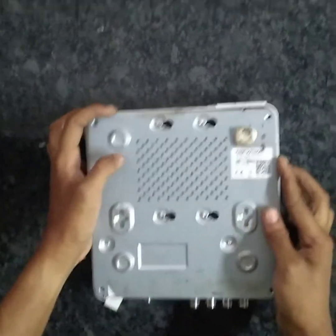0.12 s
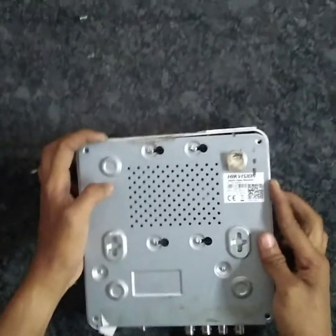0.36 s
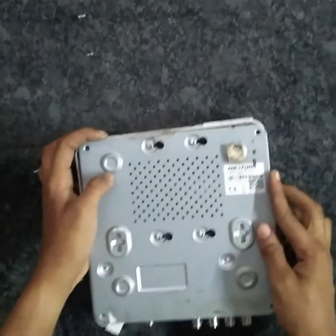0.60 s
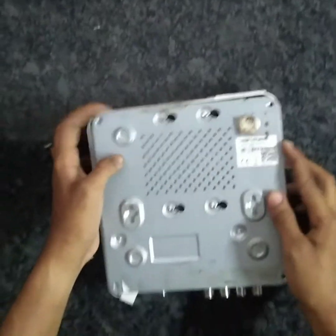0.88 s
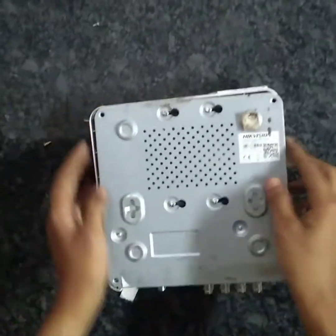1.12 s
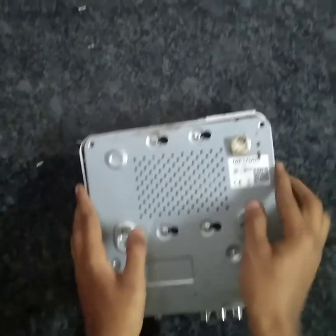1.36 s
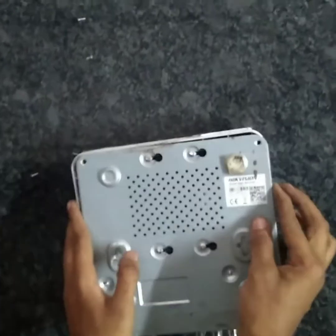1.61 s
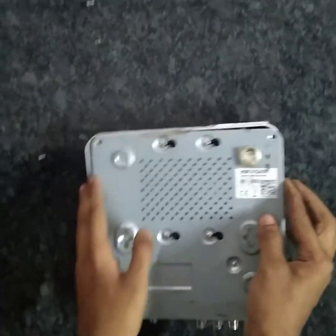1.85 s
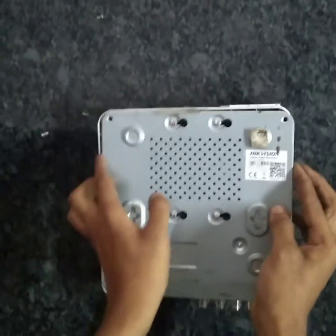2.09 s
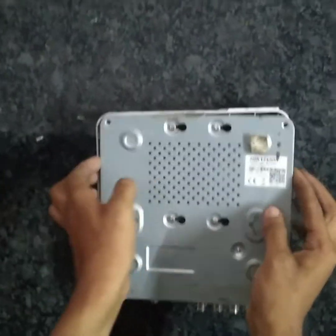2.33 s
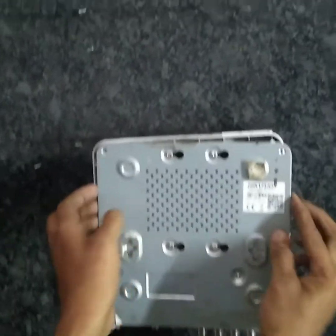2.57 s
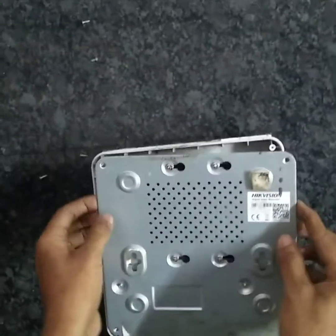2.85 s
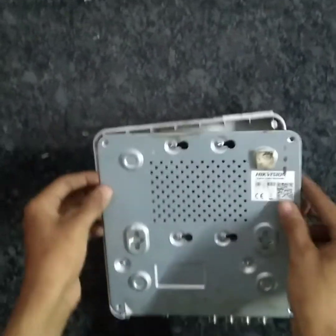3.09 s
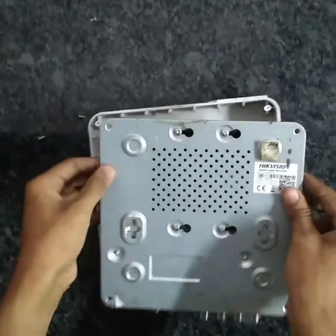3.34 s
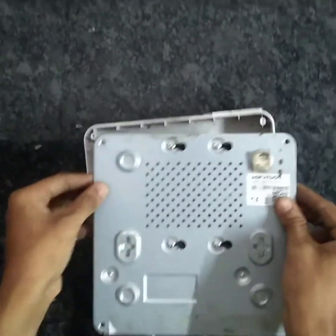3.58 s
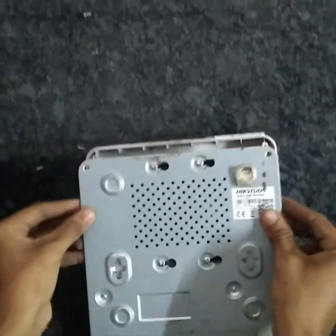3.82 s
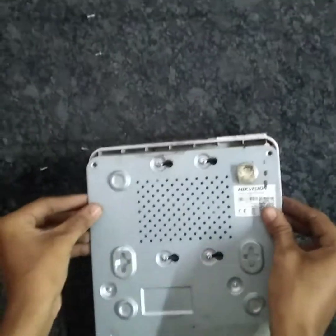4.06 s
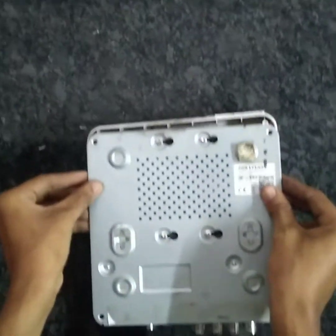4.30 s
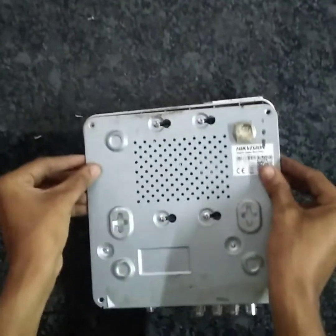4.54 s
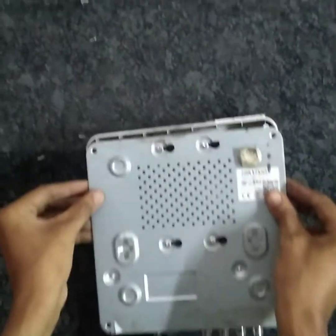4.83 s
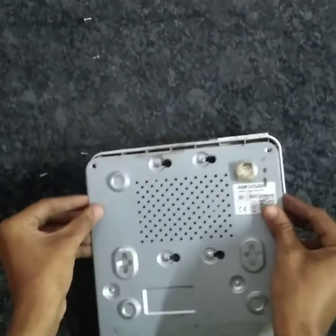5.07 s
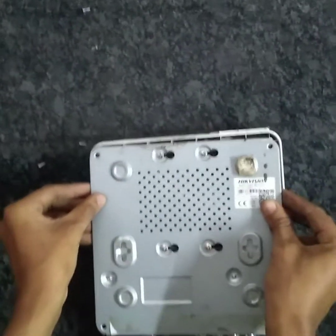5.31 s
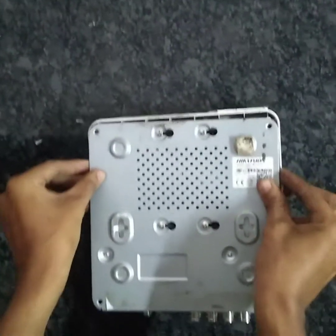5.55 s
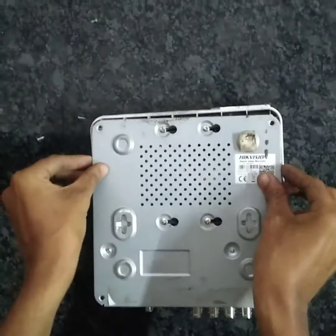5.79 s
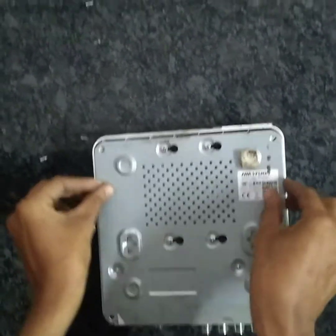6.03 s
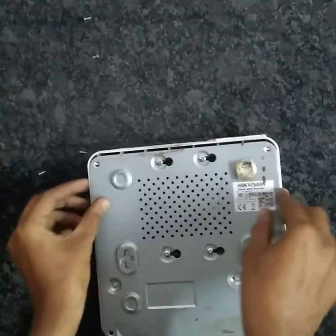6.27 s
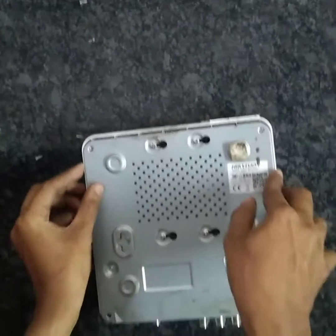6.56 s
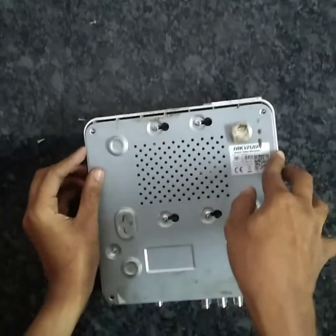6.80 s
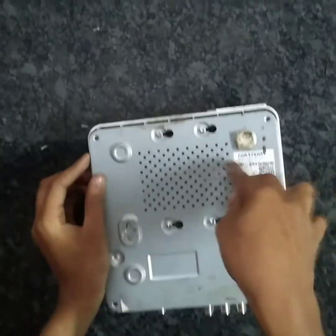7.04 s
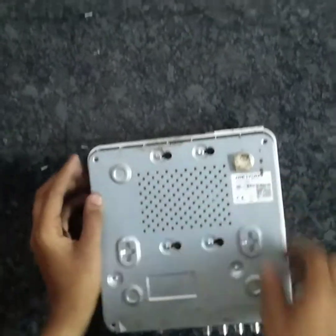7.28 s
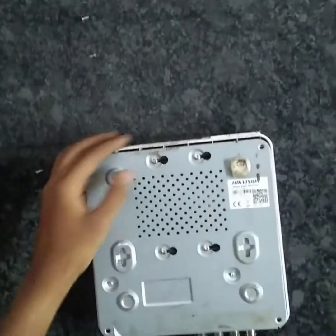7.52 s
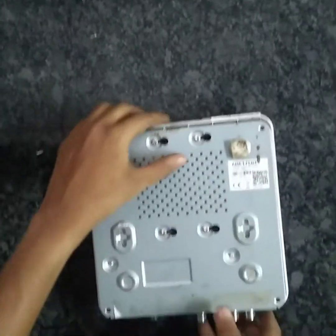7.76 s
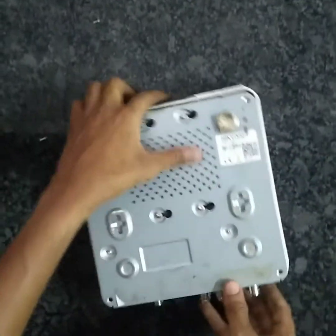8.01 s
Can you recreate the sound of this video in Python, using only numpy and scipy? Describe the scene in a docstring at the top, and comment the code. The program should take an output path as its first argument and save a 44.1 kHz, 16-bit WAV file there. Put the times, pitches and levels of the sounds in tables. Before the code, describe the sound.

Hands work the lid of a thin metal box on a stone floor. Continuous uneven rubbing and dull taps come first, then a loud knock and short metallic squeal. The middle is sparse, with light ticks and thin squeaks; rubbing edges and firm clunks return before the end settles into near silence. Distant hoarse crow calls, close stereo pickup, small room reflections.

```python
"""Sheet-metal case dragged over stone

Hands drag a metal case over a stone floor and work its lid loose: scrapes, squeaks, clicks and knocks. Drag:
random bumps swell a gliding base resonance; random contacts ring the panels and make the grit hiss. Knocks:
noise cracks plus damped case modes. Squeaks and the crow's faint caws: narrow noise bands on gliding pitches.
Stereo: two microphone ports, each minus the other after a short delay, then a noise suppressor."""
import sys
import numpy as np
from scipy import signal
from scipy.fft import rfft, irfft, next_fast_len
from scipy.io import wavfile
from scipy.ndimage import uniform_filter1d

SR = 44100
rng = np.random.default_rng(int(sys.argv[2]) if len(sys.argv) > 2 else 0)


def persist_wave(psi):
    """Save psi, clipped to +-1, as 16-bit WAV."""
    counts = np.round(np.clip(psi, -1, 1) * 32767).astype(np.int16)
    wavfile.write(sys.argv[1], SR, np.atleast_2d(counts).T)


def boost_factor(decibels):
    """Convert a level in decibels to a linear amplitude factor."""
    exponent = np.asarray(decibels, float) / 20
    return 10 ** exponent


N = 358974

# background spectrum: (frequency [Hz], level [dB])
AIR_SPECTRUM = [(30, 5.5), (100, 10), (250, 0), (600, 1), (1500, -2.5), (3000, -8), (6000, -7.5),
                (10000, -11.5), (16000, -17)]
AIR_DB = -64.5
# brief sink of the background: (centre [s], half width [s], depth [dB])
AIR_DIP = (3.8, 0.16, -6)

# crow calls: (start [s], length [s], main resonance [Hz], level [dB])
CAWS = [(0.264, 0.3, 1387, -53), (0.949, 0.38, 1330, -51.5), (1.625, 0.25, 1423, -53),
        (3.294, 0.35, 1379, -59), (3.952, .33, 1366, -61.5), (4.651, 0.27, 1373, -59)]
# throat resonances: (factor on main resonance [1], width [Hz], level [dB])
THROAT = [(0.493, 90, -7), (0.921, 88, -13.5), (1, 95.4, 12.5), (1.219, 200, -2), (1.382, 131.8, 3.5)]
CAW_EDGE_S, CAW_FADE_DB, CAW_SAG_SHARE = 0.057, -8.5, 0.071
CAW_HOARSE_DB = -10.5  # the main resonance fades into the others
CAW_PULSES_PER_S, CAW_JITTER, CAW_BREATH = 90, 5, 0.5

# edges squeaking as they slide: (peak [s], pitch [Hz], level [dB], rise [s], fall [s])
SQUEAKS = [(1.119, 309, -49.5, .3, 0.27), (3.284, 752.6, -57, .06, 0.42), (3.78, 391.4, -67.5, .1, 0.056),
           (5.07, 1636, -65.5, .045, 0.17), (5.278, 784, -51.5, 0.063, 0.059),
           (5.632, 3150, -62, 0.027, 0.079), (5.678, 3260, -60, .04, 0.045),
           (6.029, 1091, -52.5, .04, 0.11), (6.088, 435, -69.5, .4, 0.017), (6.261, 1088, -52, .15, .12),
           (6.335, 1287, -48, .12, 0.22), (6.565, 1232, -48.5, .12, 0.075), (6.664, 1336, -42, 0.14, 0.098),
           (6.84, 1304, -71, 0.15, .25)]
SQUEAK_SPAN_DB = 32  # level lost at both ends of a stroke
SQUEAK_SAG_RISING, SQUEAK_SAG_FALLING = 0.1, 0.047  # share of pitch lost at the ends
# lid edge sticking and slipping: (time [s], pitch [Hz], relative level [dB])
SQUEAL = [(2.69, 899, -39.5), (2.738, 902, -22), (2.752, 896, -30.5), (2.765, 909, -35), (2.778, 876, -22),
          (2.789, 898, -34), (2.804, 905, -24.5), (2.818, 908, -36), (2.83, 889, -26), (2.868, 888, -42.5),
          (2.888, 860, -33.5), (2.91, 885, -48), (2.97, 861, -54)]
# squeal overtones: {harmonic number: level [dB]}
SQUEAL_TONES = {2: -18, 3: -22, 4: -27, 6: -29, 7: -33}
# rubbed panel singing: (time [s], relative level [dB])
CHIME = [(1.08, -56), (1.14, -37), (1.2, -41), (1.215, -52), (1.3, -50)]

# modes of the case: (frequency [Hz], level [dB], undamped t60 [s])
CASE_MODES = [(113, -2, 0.32), (249, 0.5, 0.48), (361.2, -2.5, 0.16), (448, -4.5, 0.22), (490, -8.5, 0.31),
              (545.4, -7.5, .35), (605.3, -3.5, 0.67), (709, -4, 0.26), (781, 2.5, 0.17), (842, -3, 0.37),
              (924.3, 2, 0.12), (1105, -1.5, 0.089), (1190, -10.5, 0.17), (1270, -4.5, 0.22),
              (1815, -5.5, 0.13), (2340, -3, 0.12), (2862, -4.5, 0.12), (3150, -2, 0.063),
              (3330, -10, 0.15), (3730, -13.5, 0.1), (4990, -24.5, 0.34), (6740, -22, 0.29),
              (7460, -25, 0.18), (8400, -22, 0.33)]
# knocks and clicks: (time [s], relative level [dB], boom, bass, treble weight [dB], ring t60 [s])
KNOCKS = [(0.0209, -36, -14, -22, -4, 0.22), (0.0343, -26, -14, -29, -3.5, 0.14),
          (0.263, -33.5, -2.5, 0, -24.5, 0.4), (0.3582, -38, -27, -31, -6.5, 0.12),
          (0.6988, -26.5, -4.5, -2.5, -21.5, 0.25), (.706, -27, -37, 7, -26, 0.1),
          (0.8263, -24.5, -39, -8, -4.5, 0.094), (0.926, -38.5, -41, -6, -2, 0.34),
          (0.979, -48, 7, -15, -29.5, 0.096), (1.0584, -32, -71, 6.5, -4.5, 0.098),
          (1.092, -56, -2, -12, -27, 0.11), (1.183, -50, -3, -4, -30, 0.093),
          (1.365, -43, -14, 14, -36, 0.054), (1.4072, -42, -61, 8.5, -21, 0.13),
          (1.4778, -38, -26, -3, -6.5, 0.92), (1.5932, -29, -22, 1, -13, 0.64),
          (1.663, -21.5, -43, -15, -12, 0.26), (1.8695, -26, -22.5, -0.5, -50, 0.37),
          (2.236, -23.5, -1.5, 0.5, -16, 0.25), (2.4029, -40.5, -1, 4, -25, 0.17),
          (2.463, -32, -7.5, 1, -21, .3), (2.4761, -10, -14.5, 5, -27.5, 0.08),
          (2.6413, -22, -27.5, 8.5, -24, 0.13), (2.7229, -25.5, -17.5, -19.5, -10.5, 0.54),
          (2.8538, -36.5, -21.5, 10, -3.5, 0.15), (3.0759, -42, -41, -6, -31, 0.15),
          (3.1857, -42, -12, -17, -7, 0.11), (3.264, -48, -30, 6.5, -20, 0.25),
          (3.2919, -42.5, -35, -4.5, -20.5, 0.28), (3.3371, -39.5, -33, 4, -28.5, 0.12),
          (3.3763, -29.5, -29, -13, -16, 0.086), (3.439, -43.5, -25, 1, -20.5, .1),
          (3.477, -38.5, -13, 3.5, -27, 0.25), (3.5479, -27, -19, 0.5, -16.5, 0.055),
          (3.552, -27, -12, -1, -29.5, .045), (4.139, -45.5, -11.5, -24, -13, 0.2),
          (4.646, -45, -22, -19, -16, 0.63), (5.224, -25, -21.5, -20.5, -33, 0.11),
          (5.279, -30.5, -34, -12, -33.5, 0.18), (5.308, -31.5, -41, -34.5, -30, 0.12),
          (5.352, -25.5, -40, -26, -7.5, 0.11), (5.3639, -20, -29, -14, -8, 0.15),
          (5.389, -32, -25, -7, -11, .1), (5.568, -51, -3.5, -9, -22.5, .08),
          (5.6211, -52, 8, -24, -35, 0.068), (5.665, -45.5, -9, 6, -29.5, 0.07),
          (5.675, -36, -11, -1.5, -26.5, 0.11), (5.7454, -45.5, -1, 0.5, -20.5, 0.056),
          (5.7823, -28.5, -19, -16, -9, 0.096), (6.122, -41, 0, 16, -11.5, 0.24),
          (6.147, -13, -7.5, 1, -18, 0.11), (6.182, -35.5, -41, -19.5, 2, 0.088),
          (6.4409, -30.5, -12, -1.5, -19.5, 0.093), (6.551, -31.5, -45, -26, -5, 0.17),
          (6.6395, -38.5, -11.5, 2.5, -30, 0.22), (6.9751, -48, -6.5, -4, -6.5, 0.23),
          (6.9897, -31.5, -17.5, -20, -11.5, 0.59), (7.0434, -15.5, -28, -7.5, -17.5, 0.16),
          (7.0739, -11, -7.5, -1, -21, 0.34), (7.079, -8.5, -18, 3, -16.5, 0.043),
          (7.096, -27, 3, -1, -19, 0.36), (7.122, -23.5, 5.5, -1, -14, 0.25),
          (7.155, -31.5, 2, 1, -20, 0.15), (8.0165, -57, -3.5, -16, -4.5, 0.31)]
# noise of a blow: (frequency [Hz], level [dB])
CRACK_SPECTRUM = [(60, -45), (200, -15.5), (800, -1), (2500, -0.5), (5000, -5.5), (10000, -19.5),
                  (16000, -32)]
MODE_DETUNE = 0.01  # spread of mode pitch from blow to blow, as a share
CONTACT_S = 0.0027  # a blow builds up while the edges meet
SEAT_S, SEAT_FALL_S, SEAT_DB = 0.013, 0.005, -0.5  # free ringing, then the parts seat

# base resonance under the hands: (time [s], frequency [Hz])
BASE = [(0.0, 161), (2.04, 164), (2.27, 186.6), (4.58, 131.8), (5.69, 137.6), (5.92, 176.5), (6.28, 171.5),
        (6.64, 137.2), (6.82, 188.7), (7.2, 170.5), (7.26, 115.5), (7.64, 116), (8.14, 129.6)]
# one long drag: (time [s], rumble [dB], scrape [dB], grit [dB])
DRAG = [(0.0, -28, -37, -35), (0.08, -31, -44, -49), (0.41, -40, -56, -51), (0.57, -50, -63.5, -57.5),
        (0.62, -37, -57, -54.5), (0.72, -42, -54, -51.5), (0.78, -33.5, -60.5, -49),
        (0.88, -39.5, -50.5, -49.5), (1.11, -33, -52, -45), (1.17, -34.5, -53.5, -50.5),
        (1.35, -36, -52, -50), (1.42, -39, -53, -50), (1.9, -41.5, -52.5, -50), (2.2, -56, -54.5, -54),
        (2.29, -39.5, -53, -51), (2.36, -53, -63.5, -56.5), (2.46, -45, -40.5, -47.5),
        (2.501, -30, -43, -41), (2.63, -35, -44.5, -48.5), (2.7, -40.5, -36, -39.5),
        (2.859, -46.5, -49, -44), (2.95, -50.5, -58.5, -57), (3.04, -53, -56.5, -59.5),
        (3.2, -83, -78.5, -68)]
# separate nudges: (full force from [s], hold [s], rumble [dB], scrape [dB], grit [dB])
NUDGES = [(3.063, 0.013, -48.5, -64, -57), (3.289, 0.18, -72.5, -67, -57.5),
          (3.492, 0.039, -69, -52, -44.5), (3.979, .015, -55, -81, -73.5),
          (4.386, 0.017, -66.5, -75.5, -73.5), (4.684, 0.18, -67, -84, -64.5),
          (5.059, 0.024, -60, -95, -64.5), (5.278, 0.031, -50.5, -75, -61),
          (5.383, 0.058, -59, -66.5, -42.5), (5.628, .01, -49, -79, -54.5), (5.67, .01, -56, -79, -50),
          (5.747, 0.63, -83, -82.5, -64.5), (6.152, 0.058, -35, -57, -39), (6.27, 0.1, -50, -67.5, -59.5),
          (6.41, 0.14, -52, -74, -57), (6.575, 0.11, -62.5, -71.5, -53.5), (7.001, 0.0503, -72, -78.5, -50),
          (7.105, 0.13, -35.5, -58, -53), (7.232, .14, -44.5, -60.5, -56.5),
          (7.447, 0.091, -61.5, -72.5, -65.5), (8.003, .2, -85, -68.5, -65)]
NUDGE_RISE_DB_PER_S = 502
# nudge decay: (rumble [dB/s], scrape [dB/s], grit [dB/s])
NUDGE_FALLS_DB_PER_S = (196.5, 302.5, 348)
# hands resting on the case: (rumble [dB], scrape [dB], grit [dB])
REST_DB = (-90, -89.5, -66.5)
# scrape spectrum: (frequency [Hz], level [dB])
SCRAPE_SPECTRUM = [(250, -40.5), (500, 4.5), (900, 7), (1600, 7), (2500, -26.5), (4000, -31.5)]
# grit spectrum: (frequency [Hz], level [dB])
GRIT_SPECTRUM = [(1000, -9), (2000, 6), (3300, 1.5), (5000, -6), (8000, -17.5), (12000, -36),
                 (16000, -78.5)]
# part of the panel ring that grit excites: (frequency [Hz], level [dB])
GRIT_RING_SPECTRUM = [(1200, -40), (2500, 0), (6000, 8), (8000, -6)]
# grit thrown up by a knock: (frequency [Hz], level [dB])
FIZZ_SPECTRUM = [(3000, -24.5), (6000, 3.5), (10000, -5.5), (16000, -26.5)]
FIZZ_DB, FIZZ_FALL_DB_PER_S = -38, 128  # level re knock
SHAKE_DB, SHAKE_FALL_DB_PER_S = -18.5, 449  # grit shaken loose, level re knock
SHAKE_PER_TREBLE = 0.25  # dB of shake per dB of treble weight
TICKS_PER_S, TICK_SPREAD_DB, TICK_DB = 90, 8, -7  # loose edges ticking

# room decay: (frequency [Hz], t60 [s])
ROOM = [(150, 0.26), (700, 0.44), (3000, 0.2), (10000, 0.64)]

# bass cut of the microphone: (frequency [Hz], level [dB])
MIC_LOW = [(20, -16.5), (45, -1.5), (90, -1.5), (300, -0.5)]
# likeness of the ports: (frequency [Hz], likeness [0-1])
SHARED = [(100, 0.4), (200, .45), (400, 0.58), (800, 0.49), (1500, 0.012)]
# subtraction between ports: (frequency [Hz], share of the other port [0-1])
CROSS = [(100, 0.74), (2200, 0.82), (4500, 0.57), (8000, 0.22), (11000, 0.069), (14000, 0.37)]
CROSS_S, RIGHT_LATE_S = 0.000437, 0.000016
# phase lag of the right: (frequency [Hz], lag beyond RIGHT_LATE_S [rad])
RIGHT_TURN = [(60, -1), (170, -1.32), (250, -.8), (350, 0.29), (500, 0.3), (900, 0.3), (1400, -0.66),
              (2800, 0.012), (5000, 0.13)]
# right over left: (frequency [Hz], level [dB])
RIGHT_LIFT = [(150, -2), (1500, -.6), (4500, 2), (15000, .6)]


def evened(x):
    """Scales to rms 1."""
    return x / np.sqrt(np.mean(x ** 2) + 1e-20)


def read(points, hz):
    """Interpolates a table on a log-frequency axis."""
    f, value = np.transpose(points)
    return np.interp(np.log(hz + 1), np.log(f + 1), value)


def colour(x, points):
    """Filters x by a spectrum in dB."""
    size = next_fast_len(len(x) + SR // 10)
    gain = boost_factor(read(points, np.fft.rfftfreq(size, 1 / SR)))
    return irfft(rfft(x, size) * gain, size)[:len(x)]


def add(mix, start_s, sound):
    """Mixes a sound in at start_s."""
    part = mix[round(start_s * SR):][:len(sound)]
    part += sound[:len(part)]


def unroll(rows):
    """Time axis and sample-rate columns of a curve table."""
    s, *columns = np.transpose(rows)
    t = np.arange(s[0], s[-1], 1 / SR)
    return [t] + [np.interp(t, s, c) for c in columns]


def whistle(hz, width_hz):
    """Complex narrow-band noise: two-pole lowpass noise shifted up to the curve hz."""
    r = np.exp(-np.pi * width_hz / SR)
    slow = rng.standard_normal(len(hz)) + 1j * rng.standard_normal(len(hz))
    slow = signal.lfilter([1], [1, -2 * r, r * r], slow)
    carrier = np.exp(2j * np.pi * np.cumsum(hz) / SR)
    return slow / np.sqrt(np.mean(abs(slow) ** 2) / 2) * carrier


def random_hits(per_s, spread_db):
    """Sparse impulses at random times, with exponentially spread levels."""
    size = boost_factor(spread_db * np.minimum(rng.exponential(1, N), 3))
    return size * (rng.random(N) < per_s / SR)


def background_air():
    """Steady coloured noise that sinks briefly."""
    air = boost_factor(AIR_DB) * evened(colour(rng.standard_normal(N), AIR_SPECTRUM))
    centre_s, half_s, dip_db = AIR_DIP
    t = np.arange(N) / SR
    return air * boost_factor(dip_db * np.exp(-((t - centre_s) / half_s) ** 2))


def voice_rasp():
    """Jittered pulses of the crow's voice over steady breath."""
    jitter = CAW_JITTER * uniform_filter1d(rng.standard_normal(N), size=200)
    rate = CAW_PULSES_PER_S * (1 + jitter)
    return CAW_BREATH + evened(np.cos(np.pi * np.cumsum(rate) / SR) ** 4)


def crow(rasp):
    """Hoarse caws: noise in the throat resonances, ever more chopped by the voice pulses."""
    out = np.zeros(N)
    for start_s, length_s, top_hz, db in CAWS:
        t = np.arange(0, length_s, 1 / SR)
        progress = t / length_s
        hz = top_hz * (1 - CAW_SAG_SHARE * progress ** 2)
        caw = 0
        for factor, width_hz, part_db in THROAT:
            hoarse_db = (factor == 1) * CAW_HOARSE_DB * progress
            caw = caw + boost_factor(part_db + hoarse_db) * whistle(hz * factor, width_hz).real
        edges = np.clip(np.minimum(t, length_s - t) / CAW_EDGE_S, 0, 1)
        chop = rasp[round(start_s * SR):][:len(t)] ** progress
        add(out, start_s, boost_factor(db + CAW_FADE_DB * progress) * caw * edges * chop)
    return out


def edge_squeaks(judder):
    """Sliding edges: fuzzy bands that peak in level and pitch at the hardest push, sliding in fits."""
    out = np.zeros(N)
    for peak_s, top_hz, db, rise_s, fall_s in SQUEAKS:
        t = np.arange(-rise_s, fall_s, 1 / SR)
        slack = np.maximum(-t / rise_s, t / fall_s)  # 0 at the hardest push, 1 at the ends
        hz = top_hz * (1 - np.where(t < 0, SQUEAK_SAG_RISING, SQUEAK_SAG_FALLING) * slack)
        rub = whistle(hz, 90).real + boost_factor(-3) * whistle(0.9 * hz, 220).real
        rub += boost_factor(-20) * whistle(0.41 * hz, 90).real
        rub += boost_factor(-16.5) * whistle(1.9 * hz, 300).real
        add(out, peak_s - rise_s, boost_factor(db - SQUEAK_SPAN_DB * slack) * rub)
    return out * judder ** 1.51


def lid_squeal():
    """Stick-slip of the lid edge: a throbbing tone with overtones locked to its phase."""
    out = np.zeros(N)
    t, hz, db = unroll(SQUEAL)
    core = whistle(hz, 13)
    turn = core / abs(core)  # steady size, wandering phase
    tone = turn.real + boost_factor(-11.5) * whistle(hz, 70).real
    for harmonic, part_db in SQUEAL_TONES.items():
        flutter = whistle(0 * hz, 90)
        tone += boost_factor(part_db) * (turn ** (harmonic - 1) * core * flutter).real
    add(out, t[0], boost_factor(db + 0.5) * tone * signal.windows.tukey(len(t), 0.1))
    return out


def panel_chime():
    """A rubbed panel singing: three narrow noise bands at mode pitches."""
    out = np.zeros(N)
    t, db = unroll(CHIME)
    tones = whistle(3330 + 0 * t, 58).real + boost_factor(-0.5) * whistle(3745 + 0 * t, 60).real
    tones += boost_factor(-8.0) * whistle(2930 + 0 * t, 55).real
    add(out, t[0], boost_factor(db - 5.5) * tones * signal.windows.tukey(len(t), 0.3))
    return out


def knock(db, boom_db, bass_db, treble_db, ring_t60_s):
    """A crack, a rattle of dense high modes, case modes damped by the hands, and hollow air in the case."""
    t = np.arange(round(np.clip(1.7 * ring_t60_s, 0.12, 0.5) * SR)) / SR
    t60_s = max(ring_t60_s, 0.02)

    hz, mode_db, own_t60_s = np.transpose(CASE_MODES)[:, :, None]
    luck = rng.standard_normal((len(CASE_MODES), 3))
    hz = hz * (1 + MODE_DETUNE * luck[:, 2:])  # the grip bends the panels a little
    struck_db = mode_db + 4 * luck[:, :1]  # each blow lands elsewhere
    decay_per_s = np.hypot(1 / np.clip(own_t60_s, 0.02, 1), 1 / t60_s)
    ring = boost_factor(struck_db - 60 * t * decay_per_s) * np.sin(2 * np.pi * hz * t + 9 * luck[:, 1:2])

    noise = evened(colour(rng.standard_normal(len(t)), CRACK_SPECTRUM))
    dull = evened(colour(noise, [(400, -1.5), (3000, -14.5), (12000, -2.5)]))
    crack = noise * boost_factor(-60 * t / 0.036)
    rattle = dull * boost_factor(-11.5 - 60 * t / t60_s)
    hollow = evened(colour(noise, [(90, -8), (200, 0.5), (700, -3), (1500, -34)]))
    hollow *= (1 - np.exp(-t / 0.032)) * boost_factor(-60 * t / (1.73 * t60_s))  # swells, then lingers

    sound = crack + rattle + boost_factor(-8.5) * ring.sum(0) + boost_factor(-10.0) * hollow
    sound = colour(sound, [(150, boom_db - 7.5), (400, boom_db + 8.5), (850, bass_db),
                           (1800, 0.026), (4000, 0.0092), (7000, treble_db + 13.0)])
    seated = boost_factor(SEAT_DB * np.clip((t - SEAT_S) / SEAT_FALL_S, 0, 1))
    fade_out = np.cos(np.pi / 2 * t / t[-1])
    onset = np.clip(t / CONTACT_S, 0, 1) ** 3.6
    return boost_factor(db - 4.5) * sound * seated * fade_out * onset


def lumps(per_s, spread_db, pole_t60_s):
    """Uneven rubbing pressure: random contacts of uneven size through a double-pole decay, at rms 1."""
    r = boost_factor(-60 / (max(pole_t60_s, 0.005) * SR))
    return evened(signal.lfilter([1], [1, -2 * r, r * r], random_hits(per_s, spread_db)))


def tent(t, start_s, hold_s, rise_db_per_s, fall_db_per_s):
    """Gain of a gesture: climbs to 1 at start_s, holds, falls away."""
    rise_db = rise_db_per_s * np.maximum(start_s - t, 0)
    fall_db = fall_db_per_s * np.maximum(t - start_s - hold_s, 0)
    return boost_factor(-rise_db - fall_db)


def motion():
    """Gains of rumble, scrape, grit and fizz: drag, nudges, resting hands and knock-shaken grit add in power."""
    t = np.arange(0, N, 32) / SR
    s, *drag_db = np.transpose(DRAG)
    power = np.array([boost_factor(np.interp(t, s, db, right=-200)) ** 2 + boost_factor(rest_db) ** 2
                      for db, rest_db in zip(drag_db, REST_DB)])
    for start_s, hold_s, *levels_db in NUDGES:
        for row, (db, fall) in enumerate(zip(levels_db, NUDGE_FALLS_DB_PER_S)):
            power[row] += (boost_factor(db) * tent(t, start_s, hold_s, NUDGE_RISE_DB_PER_S, fall)) ** 2
    fizz = np.zeros(len(t))
    for start_s, db, _, _, treble_db, _ in KNOCKS:
        fizz_gain = boost_factor(db + FIZZ_DB + treble_db / 2)
        fizz += (fizz_gain * tent(t, start_s, 0, 1500, FIZZ_FALL_DB_PER_S)) ** 2
        shake_gain = boost_factor(db + SHAKE_DB + SHAKE_PER_TREBLE * treble_db)
        power[2] += (shake_gain * tent(t, start_s + 0.0054, 0, 1500, SHAKE_FALL_DB_PER_S)) ** 2
    return [np.interp(np.arange(N) / SR, t, np.sqrt(p)) for p in [*power, fizz]]


def panel_response():
    """Impulse response of the case modes, each at 0.4 of its undamped t60."""
    t = np.arange(4000) / SR
    return sum(boost_factor(db - 60 * t / (0.4 * t60_s)) * np.sin(2 * np.pi * hz * t)
               for hz, db, t60_s in CASE_MODES)


def drag(coarse, fine, bumps, tick_hits):
    """Bumps swell the base rumble; coarse slips scrape and ring the panels; finer ones make the grit hiss."""
    rumble_gain, scrape_gain, grit_gain, fizz_gain = motion()
    panels = panel_response()

    base_hz = np.resize(unroll(BASE)[1], N)
    rumble = whistle(base_hz, 40).real + boost_factor(-7) * whistle(1.3 * base_hz, 60).real
    rumble += boost_factor(-7.5) * whistle(0.68 * base_hz, 39).real
    rumble += boost_factor(-14.5) * whistle(1.7 * base_hz, 100).real * fine

    slips = coarse * np.sqrt(fine) * rng.standard_normal(N)
    scrape = evened(colour(slips, SCRAPE_SPECTRUM))
    scrape += boost_factor(-9.0) * evened(signal.oaconvolve(slips, panels)[:N])

    hiss = np.sqrt(coarse) * fine * rng.standard_normal(N)
    grit = evened(colour(hiss, GRIT_SPECTRUM))
    hiss_ring = signal.oaconvolve(hiss, panels)[:N]
    grit += boost_factor(-17.5) * evened(colour(hiss_ring, GRIT_RING_SPECTRUM))
    fizz = evened(colour(hiss, FIZZ_SPECTRUM))

    ring_t = np.arange(len(panels)) / SR
    tick_noise = rng.standard_normal(len(panels)) * boost_factor(-22.0 - 60 * ring_t / 0.032)
    tick = panels / abs(panels).max() + tick_noise
    ticking = signal.oaconvolve(tick_hits, tick)[:N]
    scrape += boost_factor(TICK_DB) * evened(ticking)
    grit += boost_factor(-17.5) * evened(colour(ticking, GRIT_RING_SPECTRUM))

    moving = rumble_gain * evened(rumble * bumps) + scrape_gain * evened(scrape)
    return moving + grit_gain * grit + fizz_gain * fizz


def room(x):
    """Convolves with a delayed noise tail whose bands die at their own speed."""
    hz, t, z = signal.stft(rng.standard_normal(SR // 2), SR, nperseg=256)
    tail = signal.istft(z * boost_factor(-60 * t / read(ROOM, hz)[:, None]), SR, nperseg=256)[1]
    tail = np.r_[np.zeros(200), tail]
    return signal.oaconvolve(x, tail / np.linalg.norm(tail))[:N]


def port(coarse, fine, rasp, bumps, tick_hits):
    """What one port hears: shared gestures, with phases of its own from the many radiating panels."""
    near = edge_squeaks(fine) + lid_squeal() + panel_chime()
    for start_s, *blow in KNOCKS:
        add(near, start_s, knock(*blow))
    distant = background_air() + crow(rasp)
    return distant + near + boost_factor(-10.0) * room(near) + drag(coarse, fine, bumps, tick_hits)


def scene():
    """Two ports driven by the same rubbing pressure, voice pulses and ticks."""
    coarse = 0.52 + lumps(90, 5, 0.16)
    fine = 0.5 + lumps(270, 3, 0.04)
    rasp = voice_rasp()
    bumps = 0.7 + lumps(30, 3.5, 0.12)
    tick_hits = random_hits(TICKS_PER_S, TICK_SPREAD_DB)
    return np.array([port(coarse, fine, rasp, bumps, tick_hits) for _ in range(2)])


def suppress(x):
    """Noise suppressor: turns down bins near their own quiet level, trimming tails and mottling the floor."""
    z = signal.stft(x, nperseg=512, noverlap=384)[2]
    power = (abs(z) ** 2).mean(0)
    power = uniform_filter1d(uniform_filter1d(power, size=5, axis=0), size=5, axis=1)
    quiet = np.percentile(power, 15, axis=1, keepdims=True)
    gain = np.sqrt(np.maximum(1 - 1.4 * quiet / power, boost_factor(-9.0)))
    return signal.istft(z * gain, nperseg=512, noverlap=384)[1][:, :N]


def roll_off(x):
    """The treble ends steeply here."""
    return signal.sosfilt(signal.butter(12, 16450, fs=SR, output="sos"), x)


def record(dry):
    """Each channel is its port minus the other one delayed, which combs mid and side."""
    size = next_fast_len(N + 64)
    hz = np.fft.rfftfreq(size, 1 / SR)
    ports = rfft(dry, size) * boost_factor(read(MIC_LOW, hz))
    shared = np.clip(read(SHARED, hz), 0, 0.98)  # long waves reach both ports alike
    ports[1] = shared * ports[0] + np.sqrt(1 - shared ** 2) * ports[1]
    delay = np.exp(-2j * np.pi * hz * CROSS_S)
    stereo = ports - np.clip(read(CROSS, hz), 0, 1) * delay * ports[::-1]
    lift = boost_factor(read(RIGHT_LIFT, hz) / 2)  # half up on the right, half down on the left
    lag_rad = 2 * np.pi * hz * RIGHT_LATE_S + read(RIGHT_TURN, hz)
    stereo = stereo * np.array([1 / lift, lift * np.exp(-1j * lag_rad)])
    cleaned = suppress(irfft(stereo, size)[:, :N])
    mix = 0.9 * np.tanh(cleaned / 0.9)  # rounds the loudest blows
    return roll_off(mix)


dry = scene()
out = record(dry)
persist_wave(out)
```